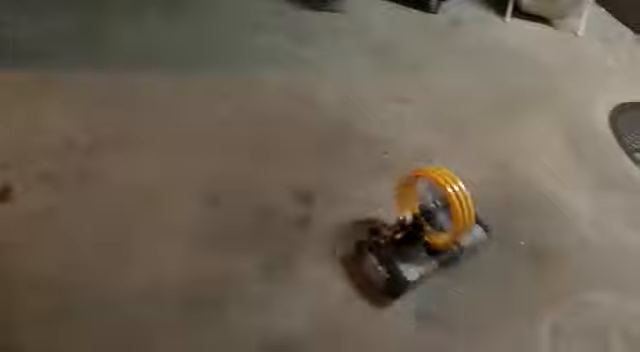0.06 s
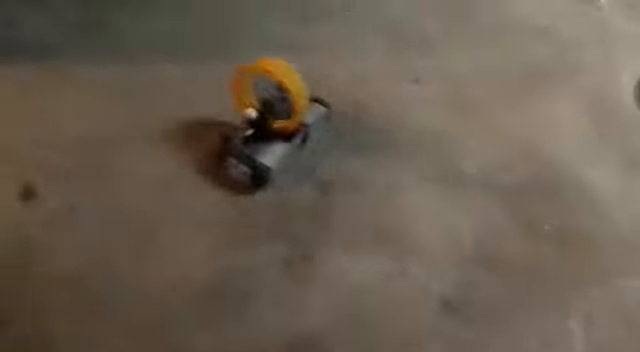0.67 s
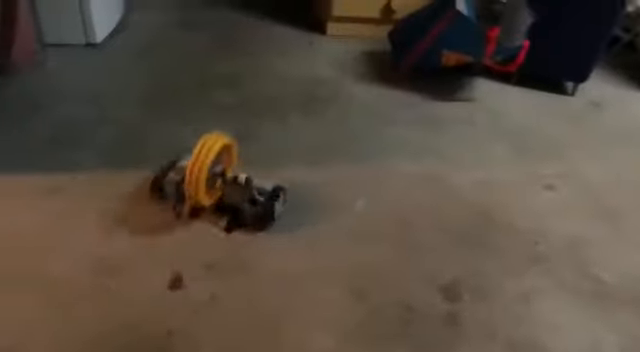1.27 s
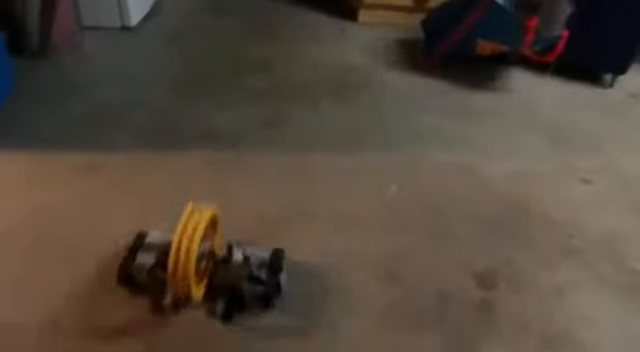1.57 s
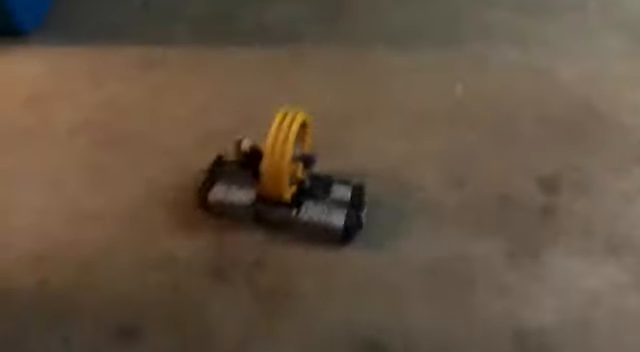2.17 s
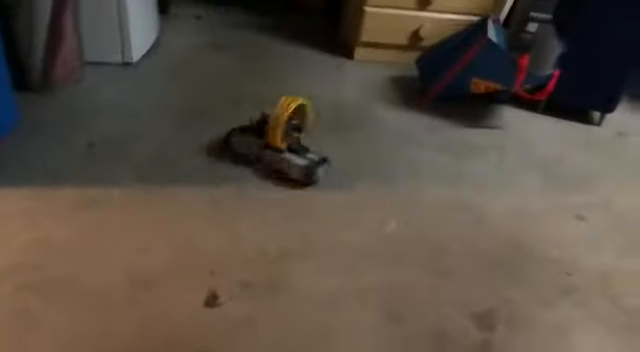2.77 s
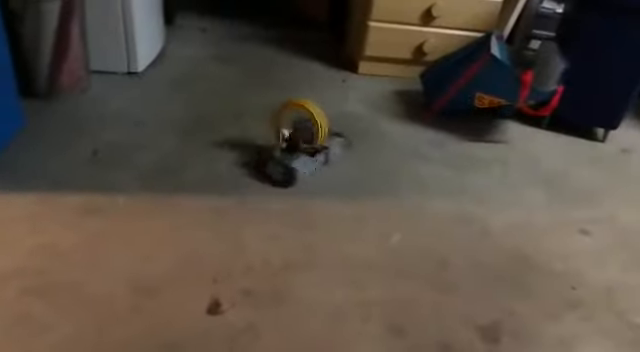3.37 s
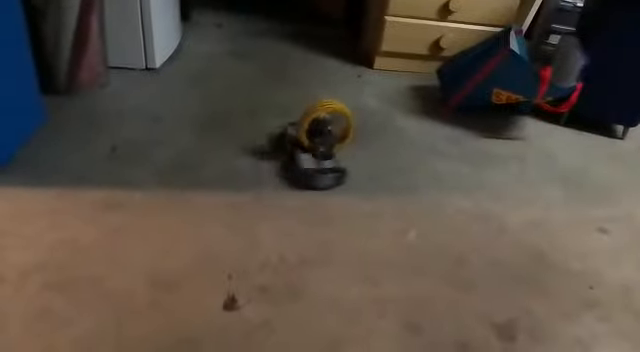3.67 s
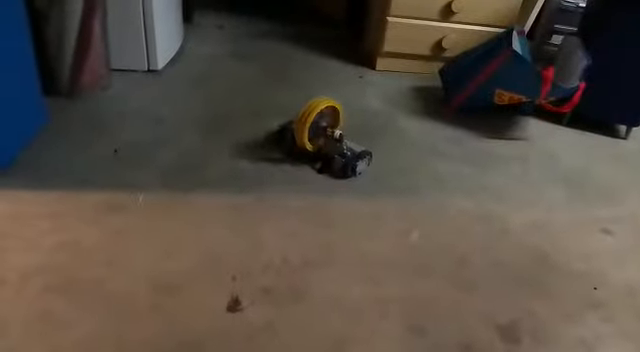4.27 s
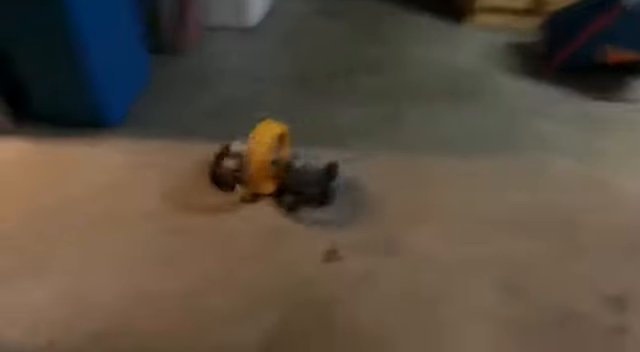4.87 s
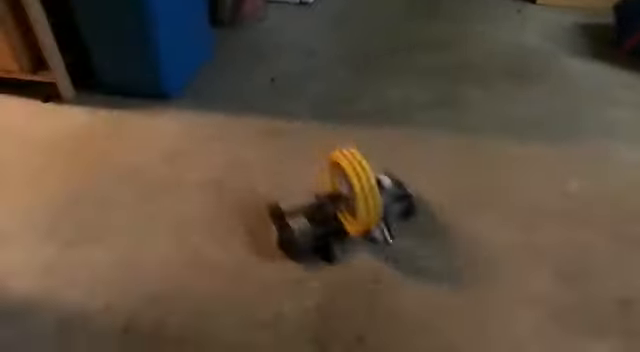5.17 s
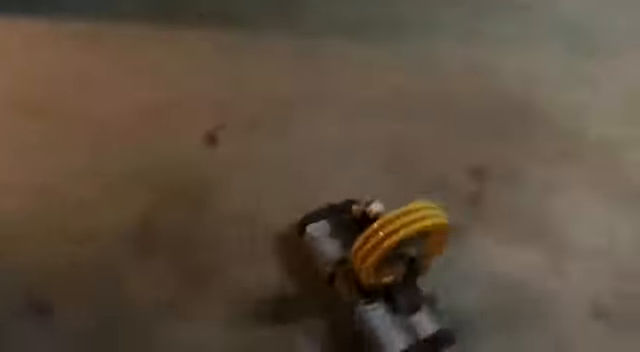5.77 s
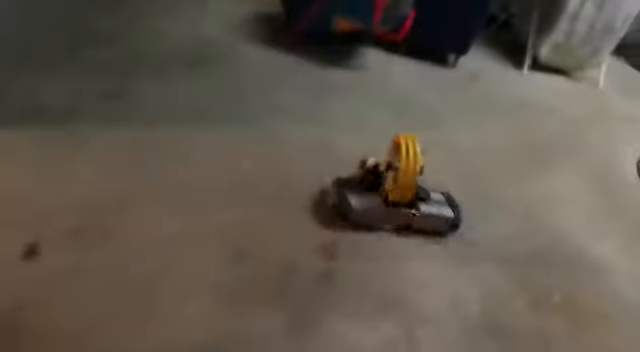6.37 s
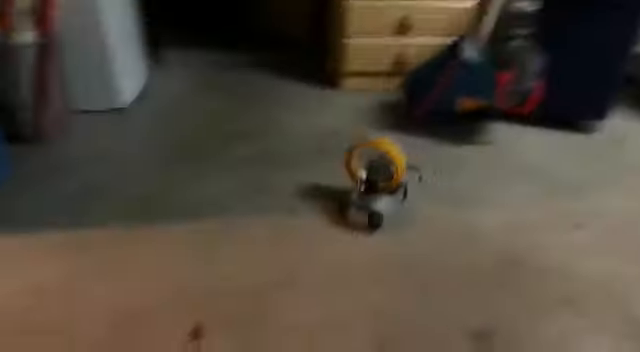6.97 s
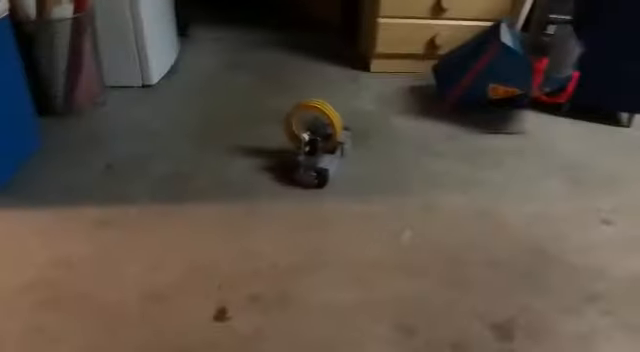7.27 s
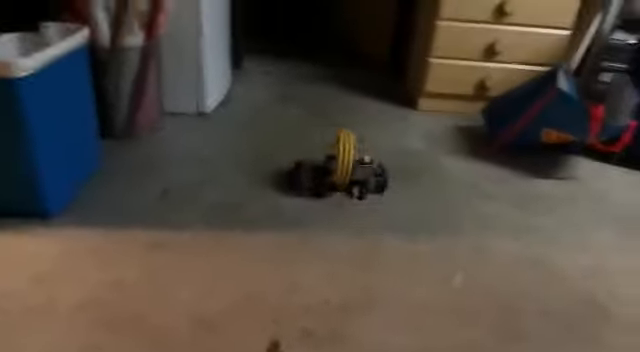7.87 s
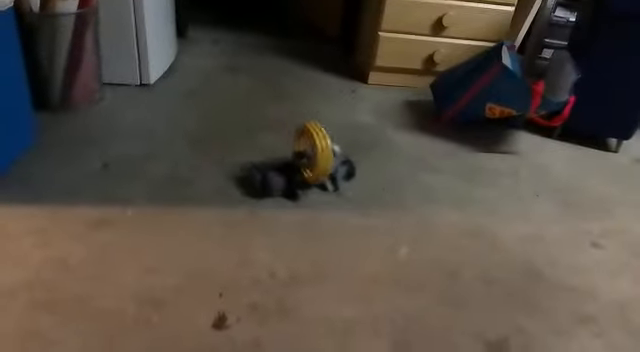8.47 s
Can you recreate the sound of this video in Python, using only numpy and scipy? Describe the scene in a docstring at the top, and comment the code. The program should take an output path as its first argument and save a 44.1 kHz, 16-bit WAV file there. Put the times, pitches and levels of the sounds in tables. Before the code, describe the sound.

A small battle robot's spinning wheel gives a continuous high gear whine with a fine rattle. Its drive motors cut in with loud, hissing, rasping bursts as it turns and scoots over concrete, with light clacks, bumps and scrapes. During one longer burst midway the whine sags in pitch, then climbs back while shorter bursts follow. The garage adds a short reverberation, and air briefly buffets the microphone near the start.

```python
"""The gear of a small battle robot's upright wheel whines at its tooth rate, and its slack teeth rattle.
The wheel spins all the time; its pitch sags when the drive motors load the battery. Two drive gearboxes
rasp in bursts, with brush and tyre hiss, as the robot turns and scoots on a concrete floor, and the
chassis clacks, bumps and scrapes. The garage reverberates, and once air buffets the microphone."""
import sys
import numpy as np
from scipy import signal
from scipy.fft import rfft, irfft
from scipy.io import wavfile
from scipy.ndimage import uniform_filter1d, map_coordinates

SR = 44100
rng = np.random.default_rng(int(sys.argv[2]) if len(sys.argv) > 2 else 0)


def wrap_up_sound(samples):
    """Save the sound to the file named by the first command line argument, as 16-bit audio."""
    columns = np.atleast_2d(samples).T
    # keep every value between -1 and 1, then stretch to whole-number steps
    tamed = np.clip(columns, -1, 1)
    steps = np.round(tamed * 32767).astype(np.int16)
    wavfile.write(sys.argv[1], SR, steps)


N = 375732
TIME = np.arange(N) / SR
CRUISE_HZ = 1850  # usual tooth rate of the wheel's gear

# pushes of the control stick: (time [s], length [s], hiss level [dB], rasp level [dB],
# spin-up time constant [s], coasting time constant [s], top speed [ratio])
PUSHES = [(0, 0.19, -31.5, -18.5, 0.0033, 0.094, 0.95), (0.387, .04, -37.5, -48, .004, .018, 1.15),
          (0.983, 0.39, -32, -20.5, 0.17, .045, .9), (1.744, 0.19, -32, -20, .04, 0.023, .99),
          (1.951, .185, -30, -16.5, 0.014, 0.036, .97), (2.826, 1.27, -36, -20.5, .025, 0.076, 1.042),
          (4.92, .165, -31.5, -16.5, .085, .035, .97), (5.614, 0.21, -33, -19.5, .025, .05, 1.04),
          (6.048, 0.041, -39, -23, 0.0044, 0.019, 0.83), (6.414, 0.16, -29.5, -18, 0.044, 0.026, 1.07),
          (6.604, 0.035, -34.5, -21, .004, .04, 1.06), (6.856, .05, -35.5, -25, 0.00403, .018, 1.07),
          (7.236, 0.055, -34, -27, 0.0041, .018, 1.18), (7.595, .06, -35.5, -28, 0.0041, .016, 1.14),
          (7.719, .285, -30, -15.8, .065, 0.049, 1.1), (8.073, 0.024, -39, -32, 0.0037, .03, 1.4)]
# spectrum of brush and tyre hiss: (frequency [Hz], spectral level [dB])
HISS_SPECTRUM = [(30, -62), (150, -29), (550, -20.5), (1000, -6), (2500, 1.5), (5000, 6.5), (8000, 2),
                 (10000, 1), (13000, -0.5), (15500, -1.5)]


def amp(db):
    """Amplitude ratio of a level in decibels."""
    return 10 ** (np.asarray(db) / 20)


def unit(x):
    """Normalisation to an rms of 1."""
    return x / np.sqrt(np.mean(x ** 2) + 1e-20)


def curve(points):
    """Linear interpolation of (time [s], value) points."""
    return np.interp(TIME, *np.transpose(points))


def at_frequency(points, hz):
    """Interpolation of (frequency [Hz], value) points on a logarithmic axis."""
    f, value = np.transpose(points)
    return np.interp(np.log(hz + 1), np.log(f + 1), value)


def colour(x, spectrum):
    """Spectral shaping by multiplication in the frequency domain; rms 1."""
    gain = amp(at_frequency(spectrum, np.fft.rfftfreq(len(x), 1 / SR)))
    return unit(irfft(rfft(x) * gain, len(x)))


def wander(rate_hz):
    """Random modulation: noise low-passed at rate_hz; rms 1."""
    hz = np.fft.rfftfreq(N, 1 / SR)
    return unit(irfft(rfft(rng.standard_normal(N)) / (1 + (hz / rate_hz) ** 2), N))


def resonance(x, hz, width_hz):
    """Two equal resonators in cascade, for steep flanks; their centre frequency may glide."""
    carrier = np.exp(2j * np.pi * np.cumsum(hz * np.ones(N)) / SR)
    pole = np.exp(-np.pi * width_hz / SR)
    for _ in range(2):
        x = 2 * (carrier * signal.lfilter([1 - pole], [1, -pole], x / carrier + 1e-18)).real
    return x


def impacts(per_s, spread_db):
    """Shot noise: a Poisson train of impulses of uneven size; rms 1."""
    size = amp(spread_db * np.minimum(rng.exponential(1, N), 4))
    return unit(size * rng.choice([-1, 1], N) * (rng.random(N) < per_s / SR))


def blows(rows, t60, hold_s=0.0026):
    """Envelope of damped impacts at (time [s], level [dB]): a brief hold, then exponential decay."""
    return sum((TIME >= s) * amp(db - 60 * np.maximum(TIME - s - hold_s, 0) / t60) for s, db in rows)


def room_tone(level_db=-61):
    """Ambient noise: the faint, steady rumble of the garage."""
    # (frequency [Hz], spectral level [dB])
    spectrum = [(25, -34), (42, -20), (58, -18), (105, 10), (140, -28), (197, -5), (260, -4),
                (600, 14), (3000, -3), (15000, -41)]
    return amp(level_db) * colour(rng.standard_normal(N), spectrum)


def garage_reverb(x, patterns=7, step_s=.09):
    """Reverberation: each band decays at its own rate; reflection patterns crossfade as the robot moves."""
    # decay of the garage: (frequency [Hz], reverberation time [s])
    decay_times = [(150, 0.67), (1000, 0.8), (5000, 0.28), (15000, 0.53)]
    echo = np.zeros(N)
    for k in range(patterns):
        reflections = rng.choice([-1., 1.], SR) * (rng.random(SR) < 3000 / SR)
        reflections *= np.arange(SR) > .002 * SR
        hz, t, bands = signal.stft(reflections, SR, nperseg=256)
        decay = amp(-60 * t / at_frequency(decay_times, hz)[:, None])
        tail = signal.istft(bands * decay, SR, nperseg=256)[1]
        crossfade = np.sin(np.pi / 2 * np.minimum((TIME / step_s - k) % patterns, 2))
        echo += signal.oaconvolve(x * crossfade, tail / np.linalg.norm(tail))[:N]
    return echo


def air_buffet():
    """Turbulence: pressure fluctuations right at the microphone make one short, low rumble."""
    # envelope of the gust: (time [s], level [dB])
    gust_level = [(.75, -52), (.775, -42), (.8, -48), (.828, -38), (.84, -27), (.862, -28.5), (.88, -36),
                  (.9, -34), (.92, -72)]
    # its spectrum: (frequency [Hz], spectral level [dB])
    gust_spectrum = [(15, -38), (25, -15), (182, -2), (514, -7), (834, -9), (896, -9), (1130, -13.5),
                     (1800, -15), (2340, -43), (3960, -120)]
    level = amp(np.interp(TIME, *np.transpose(gust_level), left=-120, right=-120))
    return level * colour(rng.standard_normal(N), gust_spectrum)


def gearbox(x, speed=1):
    """Modal filtering by the drive gears, with frequencies in proportion to speed; rms 1."""
    # gearbox resonances: (frequency at speed 1 [Hz], width [Hz], gain [dB])
    modes = [(1570, 450, -17.5), (3220, 570, -10.5), (4610, 1090, 2), (5520, 1060, 2), (6410, 1440, 0.5)]
    return unit(sum((-1) ** k * amp(db) * resonance(x, hz * speed, width)
                    for k, (hz, width, db) in enumerate(modes)))


def chassis(clack_db=-5, ring_db=-7, bump_db=-6):
    """Impact and friction excite the frame: ringing clacks, dull bumps and hollow scraping."""
    # gear slack snaps shut or the chassis ticks on the floor: (time [s], level [dB], ring frequency [Hz])
    clacks = [(0.392, -21, 3930), (0.9825, -20, 4300), (1, -15, 4020), (1.248, -12, 4620),
              (1.3545, -12.5, 4400), (1.4085, -12.5, 4630), (1.7439, -19, 3970), (1.877, -17, 5470),
              (1.991, -14, 5500), (2.8429, -12.5, 4860), (4.9234, -18, 4454), (5.816, -11.5, 4730),
              (6.0477, -11.5, 4680), (6.6153, -18, 5786), (6.869, -13, 5600), (7.7201, -10, 6150),
              (8.075, -17, 7100)]
    # the chassis bumps on its tyres: (time [s], level [dB])
    bumps = [(0.597, -35.5), (1.155, -38), (1.211, -36), (1.239, -49), (1.768, -33), (4.988, -32),
             (6.585, -37)]
    # it drags on the concrete: (time [s], length [s], level [dB])
    drags = [(1.761, .12, -34), (1.98, 0.27, -34.5), (4.92, .15, -30), (5.625, 0.3, -36.5),
             (6.431, 0.18, -39), (7.719, 0.38, -41)]
    # its hollow resonances: (frequency [Hz], width [Hz], gain [dB])
    hollow_modes = [(859.8, 130, -5.5), (1550, 460, 0), (2695, 380, 5.5), (3030, 210, 8)]
    crack = unit(gearbox(rng.standard_normal(N)) + colour(rng.standard_normal(N), HISS_SPECTRUM))
    metal = amp(clack_db) * crack * blows([row[:2] for row in clacks], t60=0.01)
    for s, db, hz in clacks:
        metal += amp(ring_db) * np.sin(2 * np.pi * hz * (TIME - s)) * blows([(s, db)], t60=0.034)
    thud = colour(rng.standard_normal(N), [(40, -32), (130, -2), (450, 0), (1200, -9), (5000, -50)])
    grit = impacts(per_s=820, spread_db=3.5)
    scrape = unit(sum(amp(db) * resonance(grit, hz, width) for hz, width, db in hollow_modes))
    contact = sum(amp(db) * np.interp(TIME, [s, s + 0.011, s + length / 2, s + length], [0, 1, 1, 0])
                  for s, length, db in drags)
    return metal + amp(bump_db) * thud * blows(bumps, t60=0.11) + contact * scrape


def drive(mesh_hz=927.5, hiss_db=7.5, rasp_db=-2, attack_s=0.0087, speed_range=.16, chatter_db=1.0):
    """Friction hiss starts at once; inertia makes the gears' rasp swell and rise in pitch, then coast."""
    # drive gear partials: (multiple of the tooth rate, level relative to the rasp noise [dB])
    partials = [(2, -38), (3, -29.5), (5, -22), (6, -17), (7, -35)]
    hiss, rasp, speed = np.zeros((3, N))
    for s, length, push_hiss_db, push_rasp_db, spin_up_s, coast_s, top_speed in PUSHES:
        t = np.maximum(TIME - s, 0)
        spin = 1 - np.exp(-t / spin_up_s)
        coast = np.exp(-np.maximum(t - length, 0) / coast_s)
        envelope = np.minimum(t / attack_s, 1) * coast
        hiss += envelope * amp(push_hiss_db) * (0.92 + 0.08 * spin)
        rasp += envelope * amp(push_rasp_db) * (0.35 + 0.65 * spin)
        speed = np.where(TIME >= s, top_speed * (1 - speed_range * (1 - spin * coast)), speed)
    slip = 1 + .02 * wander(rate_hz=201.5)  # the tyres grip and slip, smearing the pitch
    tooth_phase = 2 * np.pi * np.cumsum(mesh_hz * speed * slip) / SR
    tones = sum(amp(db) * unit(np.sin(k * tooth_phase)) for k, db in partials)
    teeth = tones + gearbox(impacts(per_s=7000, spread_db=1), speed)
    scrub = colour(impacts(per_s=8300, spread_db=2.5), HISS_SPECTRUM)
    chatter = amp(chatter_db * wander(rate_hz=48))
    return (amp(hiss_db) * hiss * scrub + amp(rasp_db) * rasp * teeth) * chatter


def shaft_tones(shaft_phase, rattle_level):
    """Rotating unbalance hums at a chassis resonance; weak shaft partials follow the rattle's level."""
    # shaft partials: (multiple of the shaft rate, level relative to the rattle [dB])
    partials = [(1.5, -41), (2, -46), (3, -35), (6, -34), (9, -26), (10, -28), (25, -25), (35, -22),
                (38, -38)]
    # chassis resonance: (frequency [Hz], width [Hz], gain [dB])
    hum_mode = (130.6, 14.2, -59.5)
    hz, width, gain_db = hum_mode
    hum = amp(gain_db) * resonance(np.sin(shaft_phase), hz, width)
    overtones = sum(amp(db) * unit(np.sin(k * shaft_phase + 0.79 * wander(rate_hz=75)))
                    for k, db in partials)
    return hum, rattle_level * overtones


def tooth_rattle(mesh_hz, facing_db, teeth_db=-7.5, frame_db=-5.5, peak_db=-0.5):
    """Backlash: slack teeth collide; their spectrum scales with speed while the frame's stays put."""
    # the teeth at CRUISE_HZ: (frequency [Hz], spectral level [dB])
    teeth_spectrum = [(100, -40), (800, -23), (1250, -11), (2200, -13.5), (3200, -17.5), (3700, 5.5),
                      (4200, -6.5), (5000, 1), (5600, -3.5), (6200, -14), (7400, -2), (8600, -38),
                      (15500, -35)]
    # broad response of the frame: (frequency [Hz], spectral level [dB])
    frame_spectrum = [(60, -42), (190, -16), (700, -17), (1400, -9), (2200, -4.5), (3200, 1.5), (4500, 3),
                      (5400, -9.5), (6500, -5), (8000, -12.5), (10000, -15.5), (15500, -14.5)]
    # the frame's main resonance: (frequency [Hz], width [Hz])
    main_mode = (5370, 2060)
    knocks = impacts(per_s=7000, spread_db=2.5)
    position = np.cumsum(mesh_hz) / CRUISE_HZ
    teeth = map_coordinates(colour(knocks, teeth_spectrum), [position], mode="mirror")
    frame = colour(knocks, frame_spectrum)
    peak = unit(resonance(impacts(per_s=7000, spread_db=2.0), *main_mode))
    return amp(teeth_db + 0.1 * facing_db) * teeth + amp(frame_db) * frame + amp(peak_db + facing_db) * peak


def mesh_whine(tooth_phase, mesh_hz, level, facing_db, slack_db=-4.5, flutter_db=3.5, skirt_hz=120):
    """Forced vibration: mesh harmonics swell as they cross the frame's resonances; also gives their gains."""
    # mesh harmonics: (multiple of the tooth rate, level [dB], share of facing_db [ratio])
    harmonics = [(1, 0.5, 0.015), (2, 1, 0.13), (3, 1, 0.54), (4, -2, 0.73)]
    # frequency response of the frame: (frequency [Hz], gain [dB])
    response = [(1350, -45), (1520, -37), (1690, -39), (1780, -42.5), (1870, -50), (2030, -43.5),
                (2700, -33), (3300, -41), (3520, -31), (3700, -36), (4060, -27.5), (4350, -35),
                (4800, -26.5), (5400, -26.5), (5750, -29.5), (6100, -29), (7000, -37), (8000, -36.5)]
    slowing = uniform_filter1d(1. * (np.gradient(mesh_hz) < 0), size=4000)  # the teeth then run slack
    whine, gains = np.zeros(N), []
    for k, db, share in harmonics:
        phase = k * tooth_phase
        line = unit(np.sin(phase) * amp(flutter_db * wander(rate_hz=75)))
        # uneven teeth spread a skirt of sidebands, wider and stronger around the higher harmonics
        skirt = unit(np.sin(phase) * wander(k * skirt_hz) + np.cos(phase) * wander(k * skirt_hz))
        response_db = at_frequency(response, k * mesh_hz)
        gains.append(level * amp(db + response_db + share * facing_db + slack_db * slowing))
        whine += gains[-1] * unit(line + amp(-20 + 4 * k) * skirt)
    return whine, gains


def wheel_gear(teeth=13, gear_ratio=4.5, jitter=0.002207, rattle_db=-28.5, rattle_db_per_octave=8.5,
               ring_db=-15, wobble_db=0.5):
    """Gear meshing: whine and rattle, modulated by an off-centre shaft and an unbalanced wheel."""
    # the gear sags under the drive's pushes and recovers between: (time [s], tooth rate [Hz])
    tooth_rate = [(0.0, 2140), (0.21, 1910), (0.66, 1984), (0.96, 2052), (1.38, 1902), (1.75, 2018),
                  (2.12, 1568), (2.38, 1726), (2.97, 1880), (3.3, 1549), (4.03, 1372), (4.19, 1478),
                  (4.38, 1512), (4.56, 1745), (4.65, 1693), (4.96, 1792), (5.12, 1666), (5.37, 1818),
                  (5.56, 1892), (5.81, 1822), (6.08, 1851), (6.43, 1951), (6.62, 1821), (7.08, 1973),
                  (7.7, 2062), (8.05, 1845), (8.52, 1978)]
    # the robot comes and goes: (time [s], level [dB])
    gear_level = [(0, 5), (.38, -0.5), (.7, 0), (.82, -5), (.95, 2), (1.65, 1.5), (2.2, 2), (2.7, 0.5),
                  (4.3, -2.5), (5.3, 0), (6.25, 0.5), (6.75, -1), (7.4, -1.5), (8.15, -2.5), (8.5, -2)]
    # directivity of the frame's main resonance as the robot turns: (time [s], level [dB])
    facing = [(0, 0.5), (.4, -28), (.8, -28), (1.1, -6), (1.6, -11.5), (2.1, -8), (2.5, -8), (3.0, 1.5),
              (4.3, 1.5), (4.8, 0), (5.4, -0.5), (6.3, -2.5), (6.8, -1), (7.5, 2), (8.5, 1.5)]
    # the motor falters as the drive switches in: (level change [dB], lead on the push [s], width [s])
    falter = (-2.5, 0.015, 0.012)
    mesh_hz, facing_db = curve(tooth_rate), curve(facing)
    falter_db, lead_s, width_s = falter
    dips = sum(np.exp(-((TIME - s + lead_s) / width_s) ** 2) for s, *_ in PUSHES)
    level = amp(curve(gear_level) + falter_db * dips)
    rattle_level = level * amp(rattle_db + rattle_db_per_octave * np.log2(mesh_hz / CRUISE_HZ))
    shaft_phase = 2 * np.pi * np.cumsum(mesh_hz * (1 + jitter * wander(rate_hz=110.2))) / SR / teeth
    wheel_phase = shaft_phase / gear_ratio
    off_centre = 0.34 * np.sin(shaft_phase) * wander(rate_hz=36)
    tooth_phase = teeth * shaft_phase + off_centre + 0.31 * np.sin(wheel_phase)
    whine, gains = mesh_whine(tooth_phase, mesh_hz, level, facing_db)
    hum, overtones = shaft_tones(shaft_phase, rattle_level)
    rattle = rattle_level * tooth_rattle(mesh_hz, facing_db) * (1 + 0.08 * np.sin(shaft_phase))
    # smeared upper harmonics are heard only as they cross a high resonance of the metal
    upper = sum(np.sin(k * tooth_phase + 1.8 * wander(rate_hz=190)) for k in range(5, 9))
    ring_level = amp(ring_db) * np.sqrt(rattle_level * gains[1])
    ring = ring_level * unit(resonance(upper, hz=11840, width_hz=1300))
    load = amp(wobble_db * np.sin(wheel_phase))  # the wheel loads the teeth once a turn
    return hum + load * (whine + overtones + rattle + ring)


def scene(direct_db=-1, reverb_db=-8, radiation_hz=92, treble_hz=12900):
    """Superposition at one point of the robot, its reverberation, the gust and the room tone."""
    # the top treble rises and falls: (time [s], level above treble_hz [dB])
    treble_level = [(0, -3), (1.7, -4), (2.5, 1), (4, 1), (6.6, -1), (7.4, -12), (8.5, -6)]
    direct = wheel_gear() + drive() + chassis()
    robot = amp(direct_db) * direct + garage_reverb(amp(reverb_db) * direct)
    # a small chassis radiates long wavelengths poorly
    robot = signal.sosfilt(signal.butter(2, radiation_hz, "high", fs=SR, output="sos"), robot)
    treble = signal.sosfiltfilt(signal.butter(4, treble_hz, "high", fs=SR, output="sos"), robot)
    robot += treble * (amp(curve(treble_level)) - 1)
    mono = robot + air_buffet() + room_tone()
    return np.array([mono, mono])


def record(dry, low_cut_hz=45, band_limit_hz=15850):
    """Band limiting: the microphone's signal gets a gentle low cut and a steep high cut."""
    thinned = signal.sosfilt(signal.butter(2, low_cut_hz, "high", fs=SR, output="sos"), dry)
    low_pass = signal.firwin(511, band_limit_hz, window=("kaiser", 9), fs=SR)
    return signal.oaconvolve(thinned, low_pass[None], "same")


dry = scene()
out = record(dry)
wrap_up_sound(out)
```